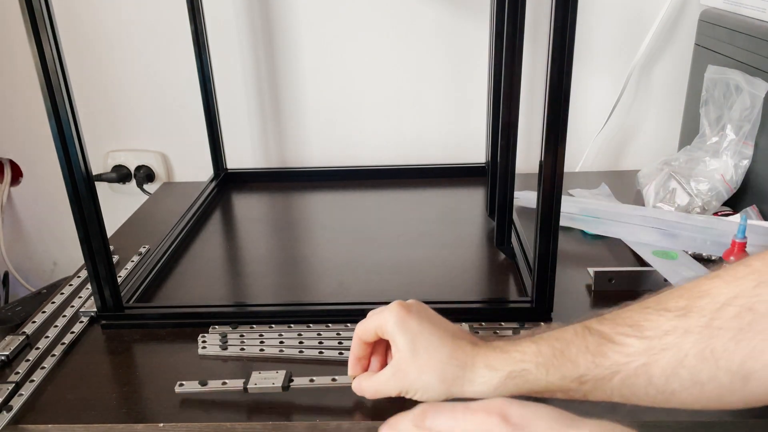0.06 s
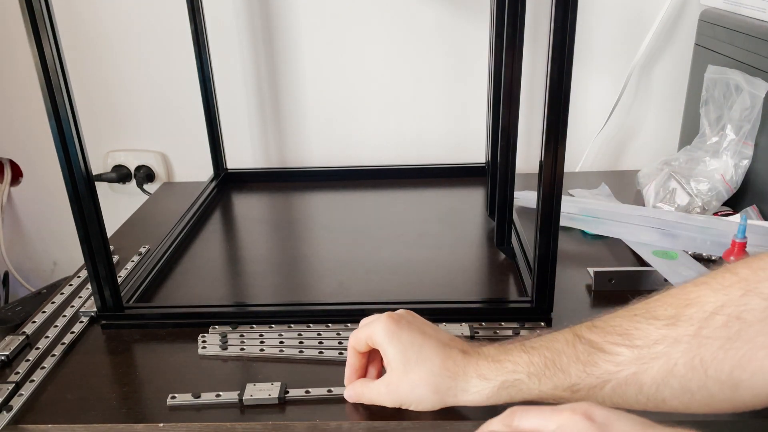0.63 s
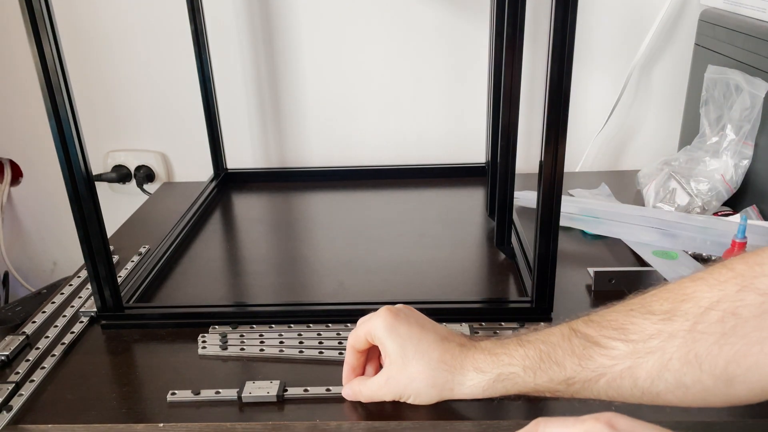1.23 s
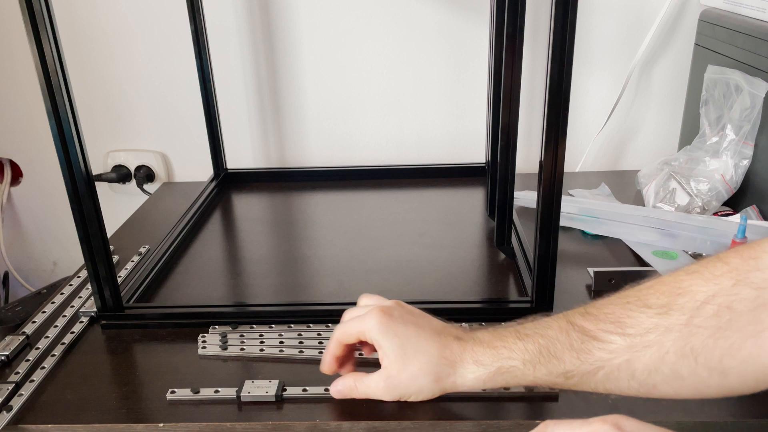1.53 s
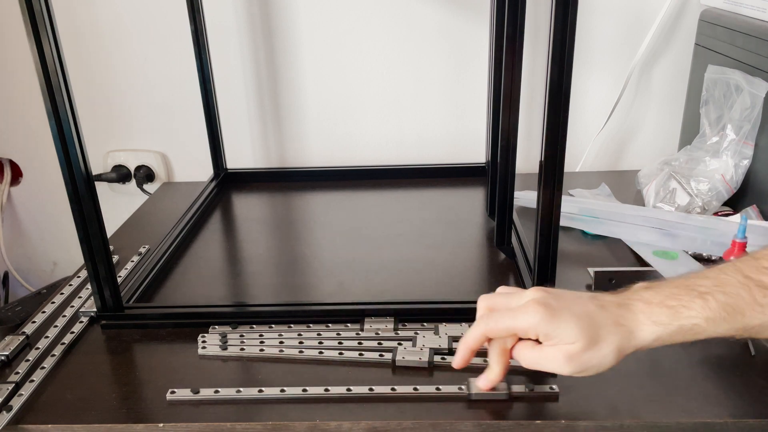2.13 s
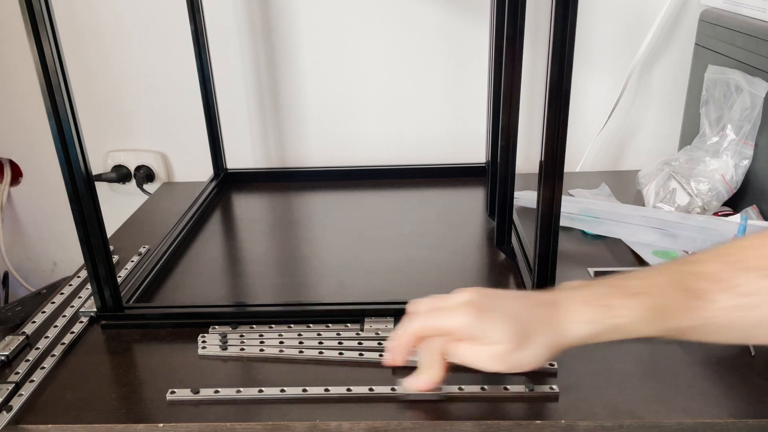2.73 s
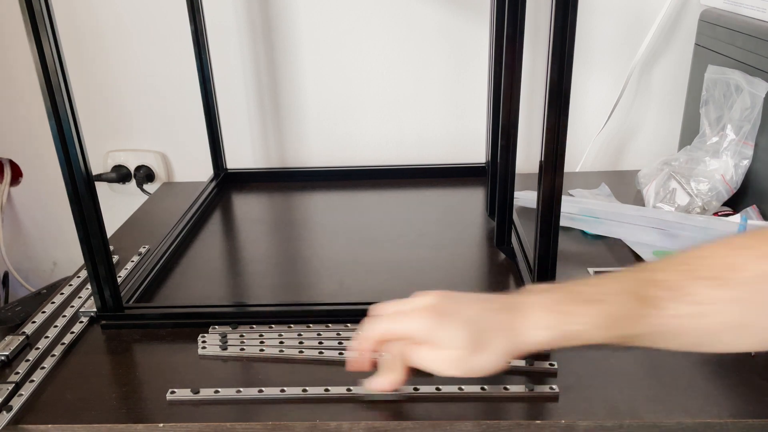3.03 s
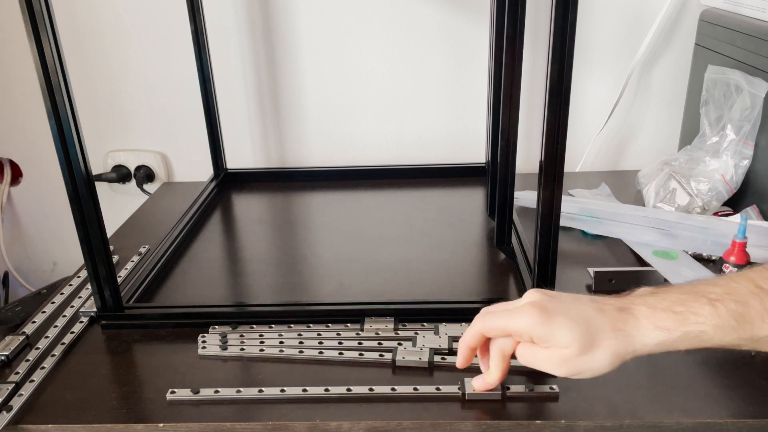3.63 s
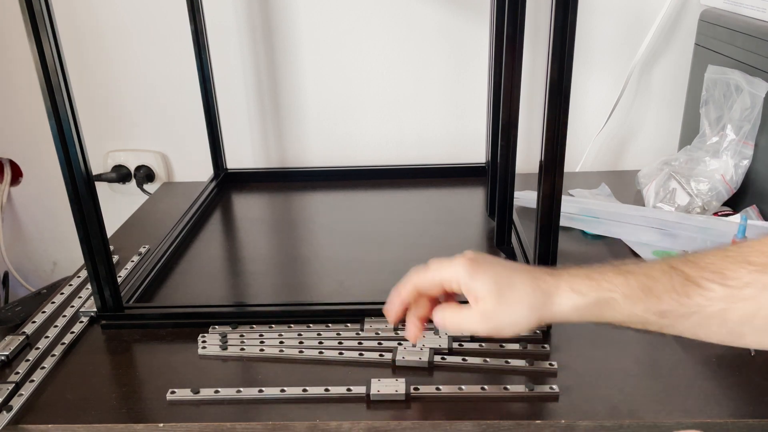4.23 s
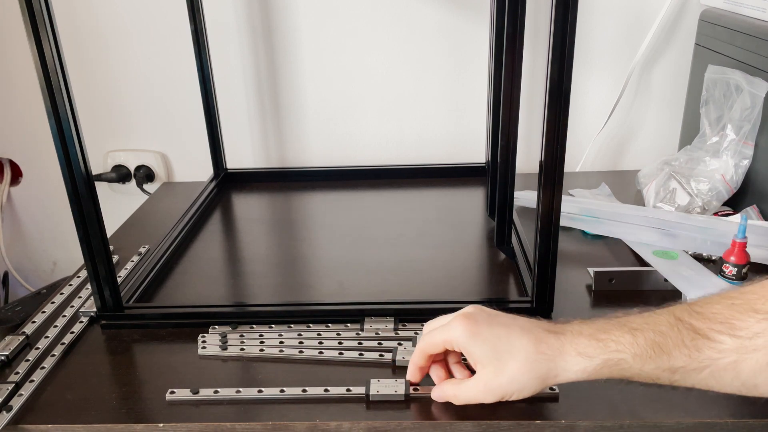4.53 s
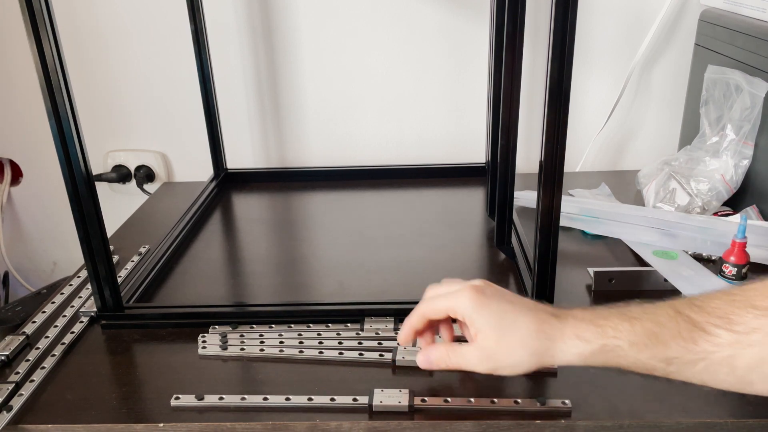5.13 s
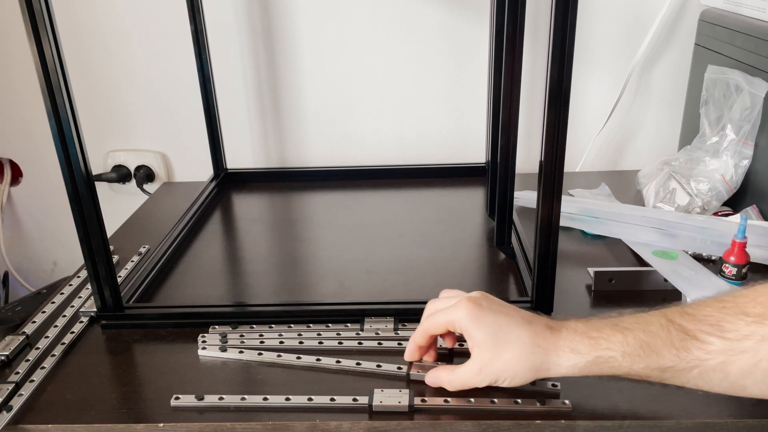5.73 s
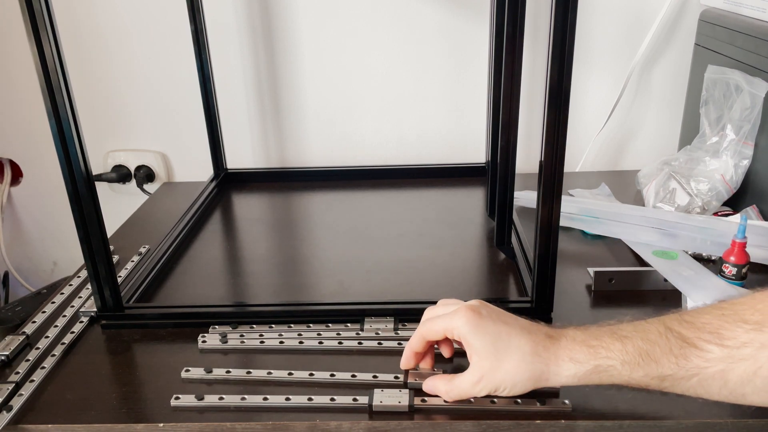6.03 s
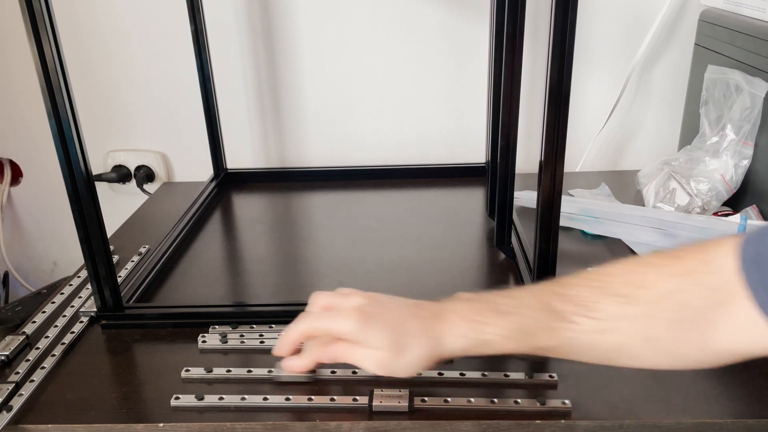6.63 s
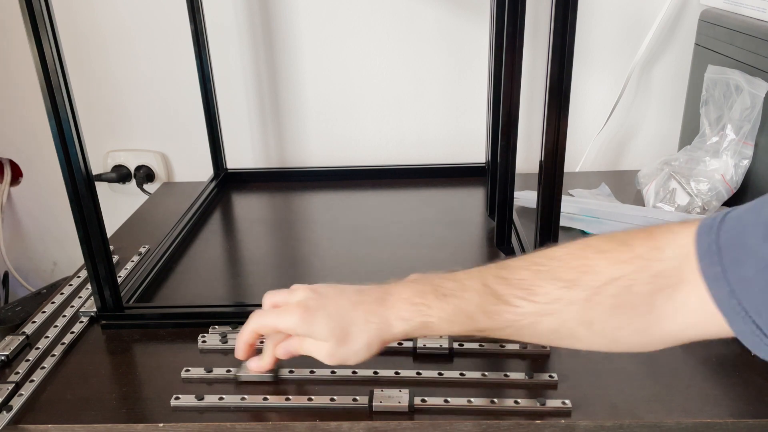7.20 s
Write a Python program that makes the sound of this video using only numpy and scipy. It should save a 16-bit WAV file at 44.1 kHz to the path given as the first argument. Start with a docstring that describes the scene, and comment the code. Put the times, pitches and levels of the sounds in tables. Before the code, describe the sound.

Dry ball bearings rattle and whirr as carriages are pushed to and fro on steel rails, with knocks and scrapes on a workbench.

```python
"""Steel rails on a workbench

In a small room, a steel guide rail is knocked twice and set down on a wooden bench with a clack.
A finger slides its carriage (the block that rides on it) to and fro: dry bearing balls rattle
and set the rail ringing. The rail is pushed aside, a second one is dragged into place,
and its carriage is slid to and fro too."""
import sys
import numpy as np
from scipy import signal
from scipy.fft import rfft, irfft
from scipy.io import wavfile

SR = 44100
rng = np.random.default_rng(int(sys.argv[2]) if len(sys.argv) > 2 else 0)


def to_wav(s):
    """Save 16-bit WAV."""
    ch = np.atleast_2d(s).T  # columns
    pcm = np.round(np.clip(ch, -1, 1) * 32767)  # PCM
    wavfile.write(sys.argv[1], SR, pcm.astype(np.int16))


N = 324576
TIME = np.arange(N) / SR

# Levels are relative: the functions add their own gains. A "colour" is the broad shape of a spectrum.
# loudness of the room tone and of a hiss that swells and fades away: t/s, level/dB
TONE_LEVEL = [(0, -62), (1.8, -62.5), (4.3, -68.5), (7.36, -66)]
HISS_LEVEL = [(0, -60), (.25, -68), (.4, -77.5), (.76, -75), (.86, -66.5), (1.1, -64.5), (1.28, -68.5),
              (1.34, -77.5), (1.85, -76), (4.2, -100)]
# colour of the room tone: f/Hz, level/dB
ROOM_COLOUR = [(18, -32.5), (30, -2.5), (59, 5), (132, -4.5), (185, -5), (337, -6.5), (597, -12),
               (735, -12.5), (1410, -6.5), (1920, -9.5), (2250, -7), (4090, -21.5), (7830, -32.5),
               (15000, -35.5)]
# time the room's echo takes to fade by 60 dB: f/Hz, decay/s
ROOM_DECAY = [(80, 0.83), (300, 0.28), (1500, 0.41), (5000, 0.48), (8000, 0.15), (13000, 0.17)]

# soft bumps of hand and rail, light taps of the rail, clinks of rail on rail: t/s, level/dB
BUMPS = [(0.157, -40.5), (0.325, -41), (0.493, -27), (1.299, -42.5), (1.812, -57), (4.111, -52.5),
         (4.391, -49.5), (4.448, -43.5), (4.502, -55), (5.265, -34), (5.334, -48.5), (5.441, -45.5),
         (5.5, -49.5), (6.263, -55), (6.403, -48.5)]
TAPS = [(0.150, -13.5), (0.32, -13.5), (4.108, -19.5), (4.44, -33.5), (4.565, -32), (4.676, -34.5)]
CLINKS = [(5.874, -47), (5.902, -39)]
# the rail lands end first and bounces: t/s, body level/dB, crack level/dB, thud level/dB, cut-off f/Hz
BLOWS = [(0.4711, -6, 7, -28.5, 14180), (0.4756, 12, 0, -17, 12000), (0.4967, 4.5, -12, 1.5, 4530),
         (0.5106, 2.5, -19.5, -0.5, 6000), (0.523, -4, -20.5, -19, 4000)]
# shoves of a rail over the bench: start t/s, rise/s, hold/s, wood level/dB, steel level/dB
DRAGS = [(1.133, 0.031, 0.063, -57, -80), (1.274, 0.012, 0.016, -53.5, -81), (4.07, 0.028, .02, -50, -64),
         (4.376, 0.016, 0.0084, -66, -78), (4.428, 0.0085, 0.0057, -56.5, -80),
         (4.479, 0.0099, 0.011, -54.5, -79.5), (4.55, 0.0136, .02, -54, -82),
         (4.60, .02, 0.024, -61.5, -84), (4.671, 0.0087, 0.0088, -58, -80),
         (4.768, 0.041, 0.12, -58, -79.5), (4.931, 0.0256, 0.032, -55, -79),
         (5.239, .015, 0.0073, -59, -72), (5.362, .035, 0.1, -65, -61), (5.5, 0.017, 0.023, -67, -68),
         (5.773, 0.1, 0.025, -53, -49.5), (6.036, .07, 0.0098, -74, -63.5)]
# modes (the tones a struck thing rings with), each fading by 60 dB: f/Hz, level/dB, decay/s
BENCH_MODES = [(63.85, -16, 0.23), (95.3, -1, 0.087), (103.1, 2, 0.2), (166, -19.5, 0.13)]
TAP_MODES = [(443.3, 0, 0.042), (855, -6, .09), (1260, -7, 0.22), (1644, -8.5, 0.093), (2123, -13, .1),
             (2560, -15.5, .06), (3480, -22.5, .1), (6300, -26.5, .11)]
CLINK_MODES = [(1059, -2, 0.15), (1239, 1, 0.13), (1316, -11, 0.1), (1730, -5, .15)]
STRUCK_MODES = [(351, -1.5, 0.35), (457, -15.5, 0.14), (585, -13, 0.33), (647, -12.5, 0.3),
                (660, -14, 0.15), (754, -20.5, 0.18), (830.6, -10.5, 0.21), (937, -17.5, 0.09),
                (1016, -12.5, 0.24), (1192, -18.5, 0.31), (1340, -22.5, 0.22), (1385, -9.5, 0.18)]
STRUCK_OVERTONES = [(1604, 6, 0.3), (2320, 3, 0.44), (3070, -16.5, 0.38), (3290, 1, 0.35), (4340, 1, 0.34),
                    (4860, -2.5, 0.25), (6090, -1, 0.26)]
# colours of tapping, dragging and landing: f/Hz, level/dB
TAP_COLOUR = [(60, -13.5), (150, -14), (420, -1.5), (650, -1.5), (1700, -5), (2600, -22.5), (4200, -25),
              (6500, -23.5), (11500, -34.5), (14000, -55)]
PLANK_COLOUR = [(50, -5), (110, -3.5), (200, -13), (380, -3), (550, -12), (900, -8.5), (1400, -17),
                (4000, -30.5), (8000, -52), (10500, -30.5), (13500, -52)]
DRAG_COLOUR = [(410, -42), (800, -5), (1400, -18), (2100, -23), (3000, -12), (4500, -25), (5500, -27),
               (8000, -31), (10900, -24), (14000, -46)]
BLOW_COLOUR = [(50, -37), (110, -21), (170, -12.5), (240, -2), (330, 0.5), (450, -6), (620, -2.5),
               (1050, -2.5), (1280, -9), (1550, -4.5), (2100, -9.5), (5000, -12), (6200, -7.5), (7500, -18),
               (11800, -28), (12800, -48)]
CLACK_COLOUR = [(100, -40), (350, -13), (1100, -13), (2500, -32), (8000, -60)]
THUD_COLOUR = [(50, -24), (110, -2.5), (230, -2.5), (400, -4), (900, -25.5), (3000, -61.5)]
CRACK_COLOUR = [(800, -18), (1600, -9), (2700, -14.5), (4500, -5.5), (6200, -11), (7800, -8.5),
                (9500, -6.5), (11500, -3), (12500, -7), (13500, -24.5), (15000, -26), (16500, -21)]
# resonances of the scraped plank, the dragged steel and the struck bench: f/Hz, width/Hz, level/dB
PLANK_PEAKS = [(343.6, 37, 7), (816, 114, -3)]
DRAG_PEAKS = [(1250, 330, -14.5), (1947, 114, 0.5), (2920, 90, -21), (4557, 590, -21), (6130, 450, -21.5)]
CLACK_PEAKS = [(420, 130, -2), (790, 330, 2.5), (1060, 110, -1.5), (1577, 220, -4)]
THUD_PEAKS = [(106, 12, 8.2), (153, 14, 11), (305, 30, 4.6)]

# squeaks of the carriage: middle t/s, f/Hz, level/dB
SQUEAKS = [(1.985, 919, -47.5), (2.17, 793, -50), (2.225, 808, -51.5), (2.485, 895, -46.5),
           (2.58, 825.5, -46.5), (2.735, 817, -47.5), (3.235, 808, -46.5), (3.592, 800, -47),
           (3.752, 855, -54)]
# single knocks of the carriage: t/s, level/dB, extra level of the high tick/dB
CATCHES = [(0.318, -46, -6), (2.162, -31, -13), (2.312, -22, 5), (2.792, -30, -10), (2.81, -23, -14),
           (3.178, -28, -2), (3.514, -41, -6), (3.741, -40.5, -5), (5.874, -36, -26.5), (5.899, -20.5, -30),
           (5.911, -25, -30), (5.924, -23, -30), (6.903, -40, -15)]
# strokes of the carriage, each ending where the next starts: start t/s, fastest t/s,
# then at full speed: rail level/dB, ball level/dB, bench level/dB, whirr f/Hz, whirr level/dB
FIRST_RUN = [(1.883, 1.999, -41.5, -42.5, -57.5, 5000, -60), (2.139, 2.297, -41.0, -42.5, -56, 4970, -53),
             (2.406, 2.556, -40.5, -40.5, -58.5, 5074, -50), (2.651, 2.798, -37.5, -41.5, -56.0, 5600, -56),
             (2.911, 3.041, -40.5, -40, -59.5, 5270, -51), (3.163, 3.262, -42.5, -41.5, -59.5, 5100, -51),
             (3.415, 3.52, -41.5, -40.5, -58.5, 4660, -49.5), (3.667, 3.768, -39.5, -38.5, -61, 4870, -49),
             (3.901, 4.028, -48.5, -52, -60.5, 3210, -63)]
SECOND_RUN = [(6.492, 6.597, -47, -51.5, -67, 4150, -58), (6.719, 6.854, -44.0, -46.5, -61.5, 5700, -49),
              (6.96, 7.065, -43.5, -44.5, -63.0, 6350, -56), (7.2, 7.307, -44.0, -47.5, -65.5, 6140, -55)]
# what still sounds while the carriage turns round: rail level/dB, ball level/dB, bench level/dB
FIRST_TURN_DB = (-55.5, -68.5, -70)
SECOND_TURN_DB = (-57, -71.5, -70.5)
# colours of bench, rail and balls as the carriage runs: f/Hz, level/dB
BENCH_COLOUR = [(40, 0), (100, -15), (270, -7.5), (370, -6), (700, -2.5), (1000, 0.5), (1400, -5.5),
                (3000, -41)]
RAIL_COLOUR = [(450, -30.5), (900, -13), (1500, -4.5), (2400, -2), (3200, -6.5), (4800, -5), (5600, -11.5),
               (6500, -7), (7500, -19.5), (9500, -21), (13000, -30)]
BALL_COLOUR = [(5000, -63), (7800, -3.5), (8800, -2), (10400, -19.5), (12300, -9), (13000, -17),
               (13700, -34), (14700, -27), (15800, -36)]
# resonances that the balls wake: f/Hz, width/Hz, level/dB
BENCH_PEAKS = [(361, 36, 3.8), (478.5, 35, 2.9), (855, 19, 7.2)]
FIRST_RAIL_PEAKS = [(1215, 14, 7), (1504, 27.4, 4.5), (2560, 150, -20), (3520, 300, 8), (4400, 240, -2),
                    (6130, 160, 3)]
SECOND_RAIL_PEAKS = [(1518, 50, -6), (1970, 105, 1.5), (2850, 280, -2.5), (3330, 86, 0), (4130, 1900, -8),
                     (5040, 97, -16), (6240, 520, -9)]
CARRIAGE_PEAKS = [(10280, 520, -2.5), (10670, 680, -3), (11600, 1200, -0.5), (14500, 760, -18)]
# gliding ring of the rail on each side of the carriage: travel from the right end (0-1), f/Hz, level/dB
ZIP_RIGHT = [(0, 9760, -10), (.14, 10500, -2), (.3, 11900, -3.5), (.44, 10440, 2), (.57, 10490, 0),
             (.7, 8200, -3.5), (.82, 10310, -3), (.93, 12260, -3)]
ZIP_LEFT = [(.02, 8130, -9), (0.119, 9280, -7.5), (.32, 10550, 0.5), (.5, 12080, -16.5), (.7, 11200, -5.5),
            (.95, 9580, -5.5)]

FIRST_STOP_S, SECOND_STOP_S = 4.112, 7.44   # the last stroke of each run ends
SPEED_POWERS = (.9, 1.08, .4)   # the dB of rail, balls and bench climb with these powers of the speed


def from_db(db):
    """Turn decibels into a gain."""
    return 10 ** (np.asarray(db) / 20)


def unit_power(x):
    """Scale a signal to an average power of one."""
    return x / np.sqrt(np.mean(x ** 2) + 1e-20)


def at_hz(points, hz):
    """Read a table between its rows, on a log frequency scale."""
    f, value = np.transpose(points)
    return np.interp(np.log(hz + 1e-9), np.log(f), value)


def convolve(x, response):
    """Pass a mono sound through a response: what a thing gives back for one click, mono or stereo."""
    start, end = np.flatnonzero(x)[[0, -1]]
    wet = signal.fftconvolve(x[None, start:end + 1], np.atleast_2d(response), axes=-1)[:, :N - start]
    out = np.zeros((len(wet), N))
    out[:, start:start + wet.shape[1]] = wet
    return np.squeeze(out)


def low_pass(x, hz, order=2):
    """Dull a sound above hz."""
    return signal.sosfilt(signal.butter(order, min(hz, SR * .45), fs=SR, output="sos"), x + 1e-18)


def band_pass(x, low_hz, high_hz):
    """Gently pick out one band of a sound."""
    return signal.sosfilt(signal.butter(1, [low_hz, high_hz], "band", fs=SR, output="sos"), x)


def wander(hz, size=N):
    """A smooth random curve; hz sets how fast it moves."""
    return unit_power(low_pass(rng.standard_normal(size), hz))


def flutter(depth_db, hz):
    """A randomly wavering gain."""
    return from_db(depth_db * wander(hz))


def whirr(hz, width_hz):
    """A rough, narrow band of sound that glides with hz."""
    return np.sqrt(2) * wander(width_hz) * np.sin(2 * np.pi * np.cumsum(hz) / SR)


def clicks(times, db):
    """One click per event."""
    out = np.zeros(N)
    out[np.round(np.asarray(times) * SR).astype(int)] = from_db(db)
    return out


def contacts(gain, per_s, size_db, rough_db):
    """Tiny random impacts: they come thicker as well as harder as the gain rises."""
    chance = np.clip(per_s * (gain / gain.max()) ** .3, 1200, SR) / SR
    hit = np.flatnonzero(rng.random(N) < chance)
    sizes = from_db(size_db * np.minimum(rng.exponential(1, len(hit)), 3.5))
    sizes = unit_power(sizes * rng.choice([-1, 1], len(hit)))
    return np.bincount(hit, sizes, N) * gain / np.sqrt(chance) * flutter(rough_db, 50)


def body(colour, peaks=(), peaks_db=0, size=8192):
    """How an object answers a click: resonances standing on a broad colour."""
    f = np.fft.rfftfreq(size, 1 / SR)
    power = from_db(at_hz(colour, f)) ** 2
    for hz, width, db in peaks:
        power = power + from_db(db + peaks_db) ** 2 / (1 + ((f - hz) / width) ** 2 * 2) ** 2
    # minimum phase: the answer starts at the click, never before it
    cepstrum = irfft(np.log(power) / 2)
    cepstrum[1:size // 2] *= 2
    cepstrum[size // 2 + 1:] = 0
    response = irfft(np.exp(rfft(cepstrum)))
    return response / np.linalg.norm(response)


def ringing(modes, soft_hz):
    """Fading sine tones; a soft contact weakens the high ones."""
    t = TIME[:SR * 3 // 4]
    tones = sum(from_db(db - 60 * t / decay) * np.sin(2 * np.pi * hz * t) for hz, db, decay in modes)
    return low_pass(tones, soft_hz)


def echoes(near, room, size=24576, bands=7):
    """Quick stereo reflections off bench and frame, then the room, dying away band by band."""
    t, f = TIME[:size], np.fft.rfftfreq(size, 1 / SR)
    mid, side = np.exp(2j * np.pi * rng.random((2, len(f)))) * np.sqrt(size)
    alike = np.exp(-(f / 650) ** 2)   # close microphones hear the bass alike
    noise = np.sqrt(1 + alike) * mid + np.sqrt(1 - alike) * side * [[1], [-1]]
    centres, out = np.geomspace(80, 14000, bands), 0
    onset = 1 - np.exp(-t / 0.0024)
    for hz, share in zip(centres, np.eye(bands)):
        quick, late = from_db(-120 * t / np.array([[.07], [at_hz(ROOM_DECAY, hz)]])) * onset
        decay = np.sqrt(near ** 2 * quick / quick.sum() + room ** 2 * late / late.sum())
        out = out + irfft(noise * np.interp(np.log(f + 1), np.log(centres), share)) * decay
    return out / np.sqrt(2)


def place(x, left_lag_ms, pan_db, near_db, room_db):
    """A sound reaches two microphones directly and as echoes; positive pan_db leans left."""
    near, room = from_db(near_db), from_db(room_db)
    response = echoes(near, room)
    arrival = 16 + np.array([[1], [-1]]) * left_lag_ms * SR / 2000
    response[:, :48] += np.sinc(np.arange(48) - arrival)   # the direct sound
    pan = from_db([[pan_db / 2], [-pan_db / 2]])
    return convolve(x, response / np.sqrt(1 + near ** 2 + room ** 2) * pan)


def background():
    """Dull room tone under a thin hiss."""
    tone_gain, hiss_gain = (from_db(np.interp(TIME, *np.transpose(curve)))
                            for curve in (TONE_LEVEL, HISS_LEVEL))
    tone = convolve(rng.standard_normal(N), body(ROOM_COLOUR))
    tone = place(tone, left_lag_ms=0, pan_db=2.0, near_db=-7, room_db=1.5)
    hiss = rng.standard_normal(N) + .5 * rng.standard_normal((2, N))
    return tone_gain * tone + hiss_gain * hiss


def bumps():
    """Soft pushes wake only the lowest modes of the bench top."""
    thump = convolve(clicks(*np.transpose(BUMPS)), ringing(BENCH_MODES, soft_hz=168))
    return place(low_pass(thump, 110), left_lag_ms=.05, pan_db=1.5, near_db=-22, room_db=-7.5)


def taps():
    """The rail touches the bench gently: a dull tock and a short ring."""
    push = clicks(*np.transpose(TAPS))
    tock = convolve(push, body(TAP_COLOUR))
    ring = from_db(-24) * convolve(push, ringing(TAP_MODES, soft_hz=9000))
    return place(tock + ring, left_lag_ms=0.49, pan_db=-1.5, near_db=2, room_db=12)


def clinks():
    """The dragged rail touches its neighbour and the steel rings."""
    ring = convolve(clicks(*np.transpose(CLINKS)), ringing(CLINK_MODES, soft_hz=5000))
    return place(ring, left_lag_ms=0.13, pan_db=-1, near_db=-3, room_db=1.5)


def shoves(fade_db_per_s=281):
    """Gains of wood and steel: each shove gathers speed, holds it and dies away."""
    wood, steel = np.zeros((2, N))
    for start, rise, hold, wood_db, steel_db in DRAGS:
        span = slice(int(start * SR), int((start + 1) * SR))
        t = TIME[span] - TIME[span][0]
        shape = np.minimum(t / rise, 1) ** 2 * from_db(-fade_db_per_s * np.maximum(t - rise - hold, 0))
        wood[span] = np.maximum(wood[span], from_db(wood_db) * shape)
        steel[span] = np.maximum(steel[span], from_db(steel_db) * shape)
    return wood, steel


def drags():
    """Steel sticks and slips over the wood, and the loose rail rings along."""
    wood_gain, steel_gain = shoves()
    wood_slips = contacts(wood_gain, per_s=1500, size_db=0.93, rough_db=0.9)
    steel_slips = contacts(steel_gain, per_s=4000, size_db=2.5, rough_db=2.1)
    wood = from_db(1) * convolve(wood_slips, body(PLANK_COLOUR, PLANK_PEAKS))
    steel = from_db(4.5) * convolve(steel_slips, body(DRAG_COLOUR, DRAG_PEAKS, peaks_db=4))
    return place(wood + steel, left_lag_ms=0.44, pan_db=-3, near_db=-0.5, room_db=-4.5)


def landing():
    """Steel lands on the bench: a bright crack, then the dense ring of rail and board."""
    push, chatter = np.zeros((2, N))
    t = TIME[:2048]
    for s, body_db, crack_db, _, contact_hz in BLOWS:
        at = round(s * SR)
        push[at:at + len(t)] += from_db(body_db) * low_pass(signal.unit_impulse(len(t)), contact_hz)
        # the long rail chatters for a few milliseconds as it meets the wood
        burst = rng.standard_normal(len(t)) * t * np.exp(-t / 0.0019)
        chatter[at:at + len(t)] += from_db(crack_db) * burst / np.linalg.norm(burst)
    knock = convolve(push, body(BLOW_COLOUR))
    crack = convolve(chatter, body(CRACK_COLOUR))
    times, strength_db, _, thud_db, _ = np.transpose(BLOWS)
    # the bench thuds under the whole rail; the board clacks where it is hit
    thud = convolve(clicks(times, thud_db), body(THUD_COLOUR, THUD_PEAKS))
    clack = convolve(clicks(times, strength_db - 4), body(CLACK_COLOUR, CLACK_PEAKS))
    # the heaviest blow sets the modes ringing
    modes = from_db(-37) * ringing(STRUCK_MODES, soft_hz=5000)
    modes += from_db(-51) * ringing(STRUCK_OVERTONES, soft_hz=12000)
    ring = convolve(clicks([times[strength_db.argmax()]], strength_db.max()), modes)
    return (place(knock, left_lag_ms=0.45, pan_db=-0.5, near_db=4, room_db=5)
            + place(clack, left_lag_ms=0.45, pan_db=-2, near_db=-5, room_db=-11)
            + place(thud, left_lag_ms=0.1, pan_db=2, near_db=-11.5, room_db=-8.5)
            + place(ring, left_lag_ms=0.39, pan_db=-6.5, near_db=-11.5, room_db=-14)
            + place(crack, left_lag_ms=-0.18, pan_db=0.5, near_db=-10.5, room_db=-1))


def catches():
    """Balls catch, or the carriage rocks on its rail: a knock with a high tick."""
    times, db, treble_db = np.transpose(CATCHES)
    colour = [(150, -29), (350, -38), (1200, 13.5), (2500, 1.5), (6000, -16), (14000, -48)]
    knock = convolve(clicks(times, db + 1.5), body(colour, BENCH_PEAKS[:1], peaks_db=14.5))
    tick = convolve(clicks(times, db + treble_db + 2), body(BALL_COLOUR, CARRIAGE_PEAKS))
    return (place(knock, left_lag_ms=0.28, pan_db=5.5, near_db=26, room_db=14)
            + place(tick, left_lag_ms=-0.2, pan_db=-.5, near_db=-1, room_db=-10))


def squeaks(length_s=.05, width_hz=65):
    """Balls chatter in step for a moment: short swells of a rough, wavering tone."""
    out, swell = np.zeros(N), np.hanning(int(length_s * SR))
    for s, hz, db in SQUEAKS:
        at = int((s - length_s / 2) * SR)
        pitch = hz + width_hz * wander(94, len(swell))
        tone = np.sqrt(2) * np.sin(2 * np.pi * np.cumsum(pitch) / SR)
        out[at:at + len(swell)] += from_db(db) * swell * tone
    return place(out, left_lag_ms=0.21, pan_db=-5, near_db=-23, room_db=-5.5)


def strokes(run, stop_s, turn_db, fade_db_per_s=550):
    """The hand swings like a sine, half a cycle a stroke; rail, balls and bench get louder with speed."""
    start, fastest, *full_db, _, _ = np.transpose(run)
    moments = np.sort(np.r_[start, fastest, stop_s])
    swing = np.interp(TIME, moments, np.arange(len(moments)) * np.pi / 2)
    speed, travel = abs(np.sin(swing)), (1 - np.cos(swing)) / 2   # both 0-1
    stroke = np.minimum(swing // np.pi, len(run) - 1).astype(int)
    at_rest_s = abs(TIME - np.clip(TIME, start[0], stop_s))   # time before or after the run
    moving = from_db(-fade_db_per_s * at_rest_s) * (at_rest_s < .2)
    gains = [moving * from_db(turn + (full[stroke] - turn) * speed ** power)
             for full, turn, power in zip(full_db, turn_db, SPEED_POWERS)]
    return speed, travel, stroke, gains


def bench_rumble(gain):
    """The bench top grumbles under a running carriage."""
    hits = contacts(gain, per_s=3000, size_db=1.7, rough_db=4.1)
    return convolve(hits, body(BENCH_COLOUR, BENCH_PEAKS, peaks_db=0.5))


def zipping(travel, width_hz=130, slop=.035):
    """The carriage divides its rail in two; the ring of each part glides as the carriage travels."""
    travel = travel + slop * wander(4)   # no two strokes are quite alike
    out = 0
    for part in (ZIP_RIGHT, ZIP_LEFT):
        where, hz, db = np.transpose(part)
        out = out + from_db(np.interp(travel, where, db)) * whirr(np.interp(travel, where, hz), width_hz)
    return out


def rail_ring(gain, speed, peaks, peaks_db):
    """Balls set the rail ringing; slow balls knock more softly, so the turns sound duller."""
    hits = contacts(gain, per_s=8000, size_db=2.1, rough_db=1)
    ring = convolve(hits, body(RAIL_COLOUR, peaks, peaks_db))
    dull = low_pass(ring, 2440, order=1)
    return dull + (ring - dull) * speed ** 0.67


def ball_rattle(gain, speed, hollow_share=0.43):
    """Balls knock through the carriage and it rings high; at speed the rattle turns hollow."""
    hits = contacts(gain, per_s=6000, size_db=0.71, rough_db=2.5)
    rattle = convolve(hits, body(BALL_COLOUR, CARRIAGE_PEAKS, peaks_db=-1.5))
    return rattle - hollow_share * speed ** 2 * band_pass(rattle, 7300, 9300)


def slide(run, stop_s, turn_db, rail_peaks, peaks_db, rail_db, ball_db, bench_db, zip_db, spots=4):
    """A carriage runs to and fro: its balls sound high, the rail in the middle, the bench low."""
    speed, travel, stroke, (rail_gain, ball_gain, bench_gain) = strokes(run, stop_s, turn_db)
    rail = rail_ring(rail_gain, speed, rail_peaks, peaks_db)
    highs = ball_rattle(ball_gain, speed) + from_db(zip_db) * ball_gain * zipping(travel)
    out = place(from_db(ball_db) * highs, left_lag_ms=-0.188, pan_db=-0.5, near_db=-6, room_db=-17)
    # balls run over the grinding marks of the rail: a whirr whose pitch follows the speed
    top_hz, whirr_db = np.array(run)[stroke, 5:].T
    pitch = top_hz * speed * flutter(.08, 25.1)
    tone = from_db(whirr_db) * speed ** 2 * whirr(pitch, width_hz=190) * flutter(3.1, 60)
    out += place(tone, left_lag_ms=0.514, pan_db=-11.5, near_db=-12, room_db=-9)
    # the echoes change as the carriage travels: its sound is handed from spot to spot along the rail
    lows = from_db(rail_db) * rail + from_db(bench_db) * bench_rumble(bench_gain)
    for spot in range(spots):
        share = np.sqrt(np.maximum(1 - abs((spots - 1) * travel - spot), 0))
        out += place(share * lows, left_lag_ms=0.419, pan_db=-1, near_db=7.5, room_db=3.5)
    return out


def scene():
    """Both carriage runs, the handling of the rails and the quiet room."""
    first = slide(FIRST_RUN, FIRST_STOP_S, FIRST_TURN_DB, FIRST_RAIL_PEAKS,
                  peaks_db=-10, rail_db=3, ball_db=1.5, bench_db=2.5, zip_db=-3)
    second = slide(SECOND_RUN, SECOND_STOP_S, SECOND_TURN_DB, SECOND_RAIL_PEAKS,
                   peaks_db=4.5, rail_db=3.5, ball_db=3, bench_db=1.5, zip_db=-6)
    carriages = first + second + squeaks() + catches()
    return carriages + drags() + clinks() + taps() + landing() + bumps() + background()


def record(dry, bass_hz=52, top_hz=15900):
    """A bright band leans to the right microphone; the deepest bass and the very top are cut."""
    dry = dry + band_pass(dry, 3900, 7200) * (from_db([[-2.6], [1.3]]) - 1)
    dry = signal.sosfilt(signal.butter(4, bass_hz, "high", fs=SR, output="sos"), dry)
    return signal.sosfilt(signal.ellip(10, .2, 80, top_hz, fs=SR, output="sos"), dry)


dry = scene()
out = record(dry)
to_wav(out)
```